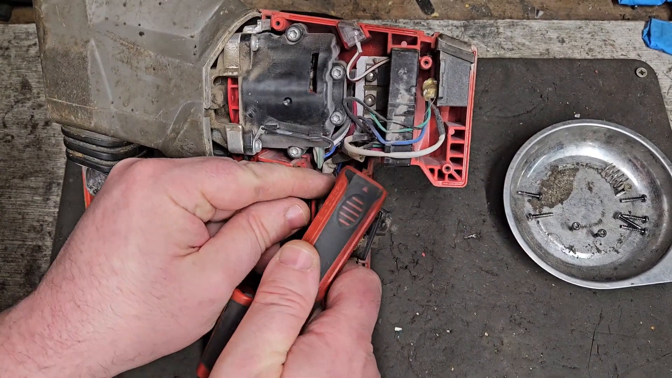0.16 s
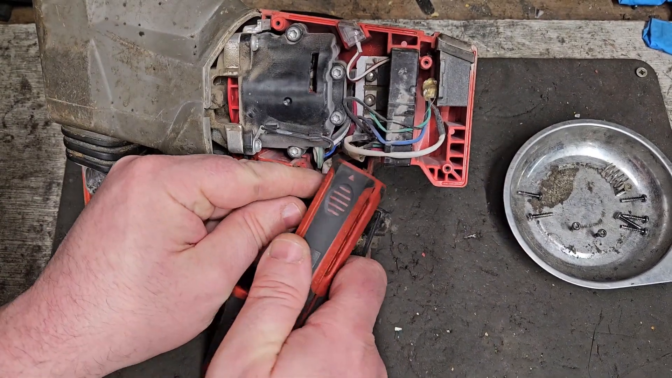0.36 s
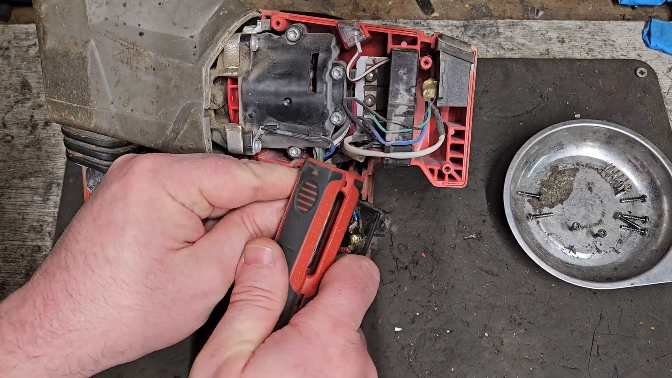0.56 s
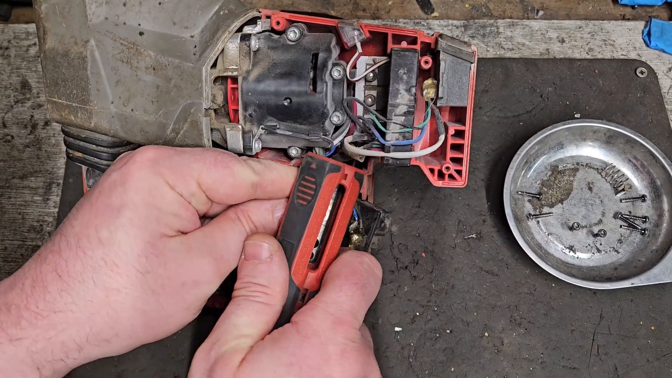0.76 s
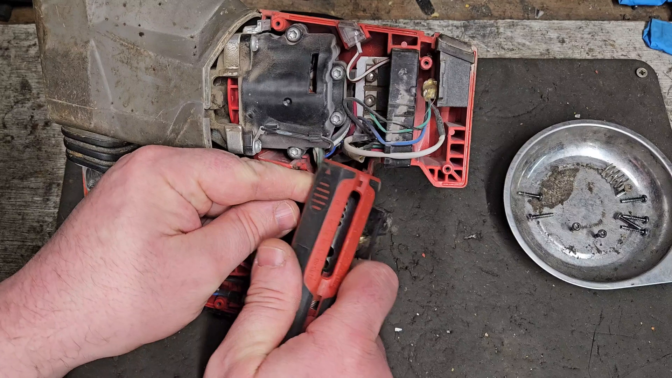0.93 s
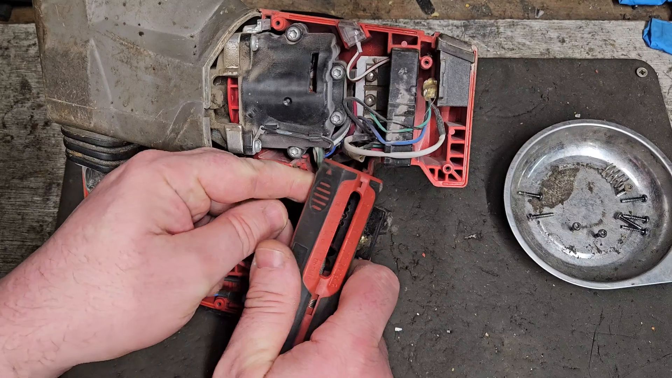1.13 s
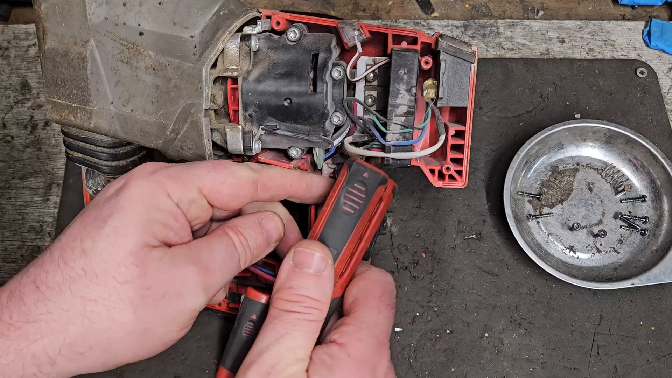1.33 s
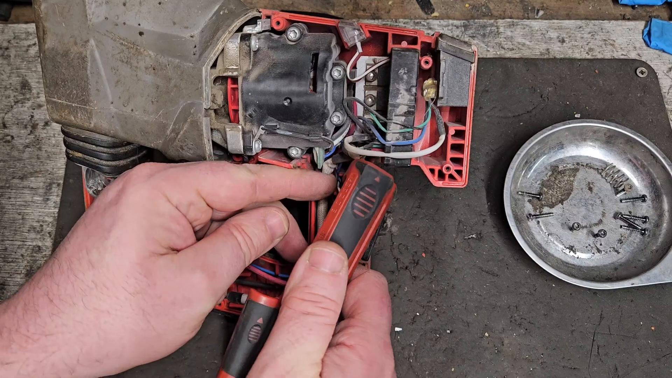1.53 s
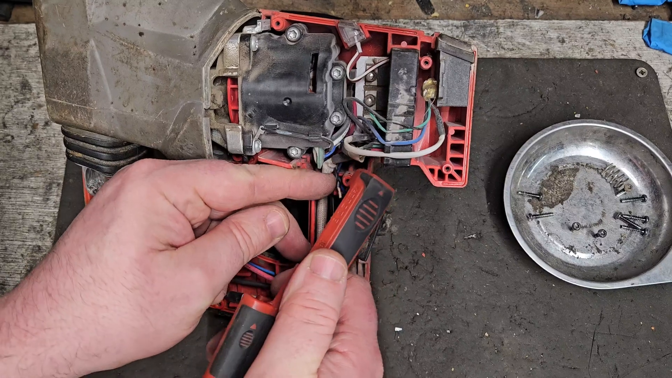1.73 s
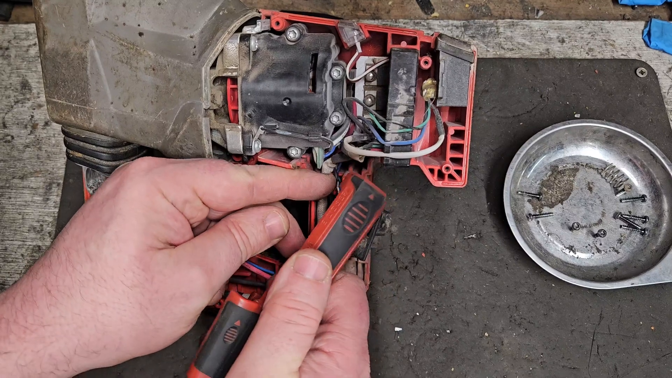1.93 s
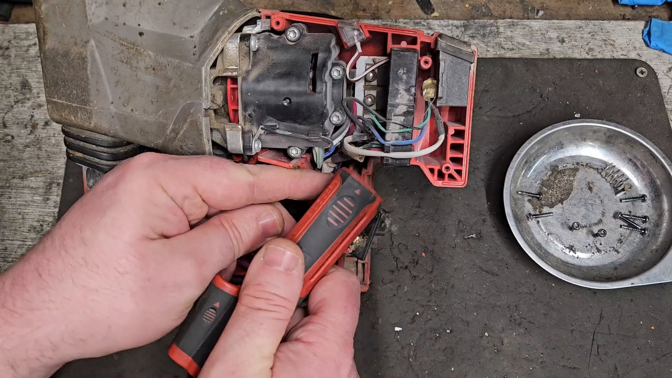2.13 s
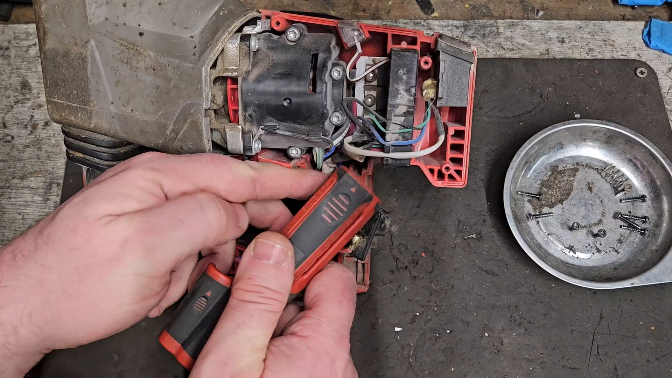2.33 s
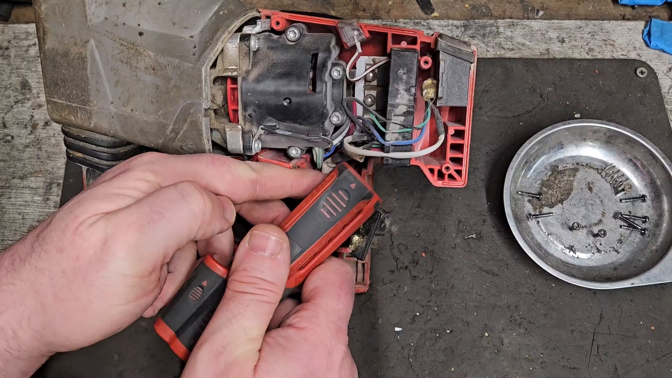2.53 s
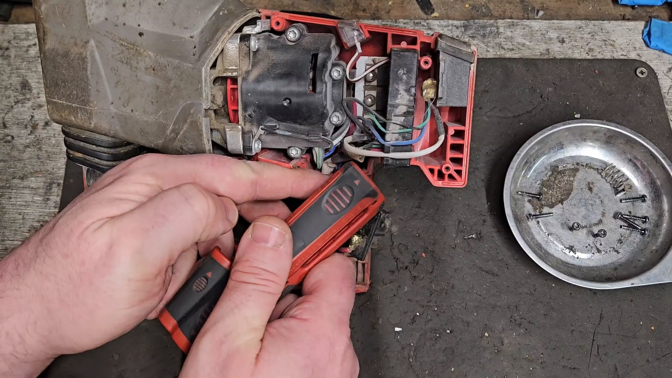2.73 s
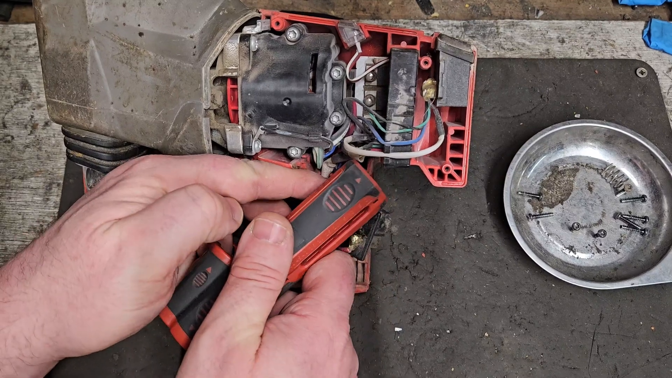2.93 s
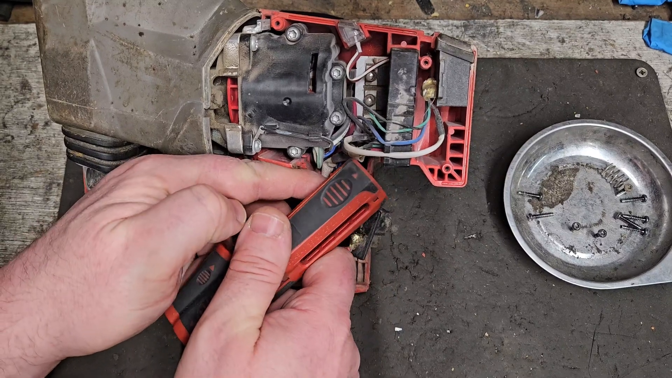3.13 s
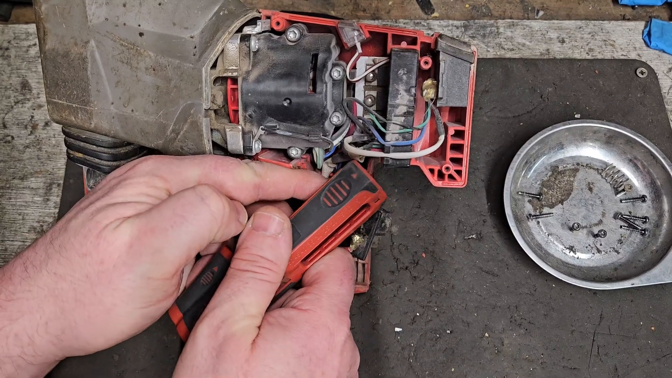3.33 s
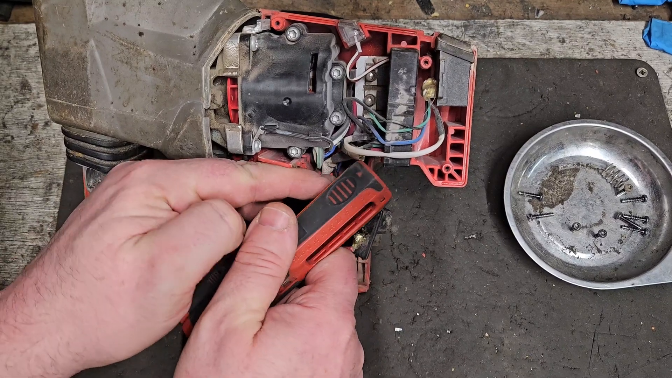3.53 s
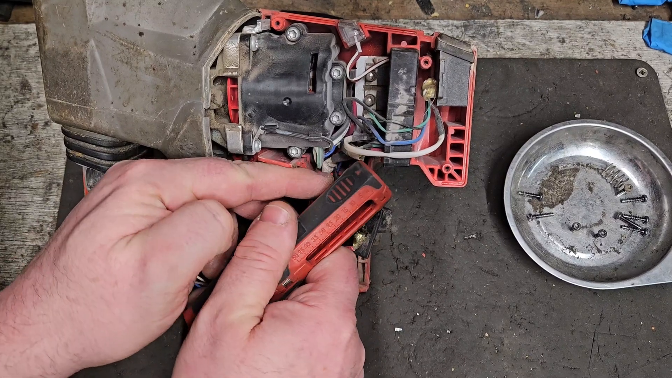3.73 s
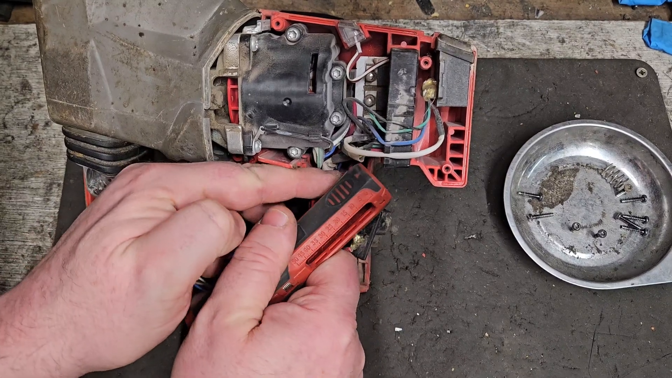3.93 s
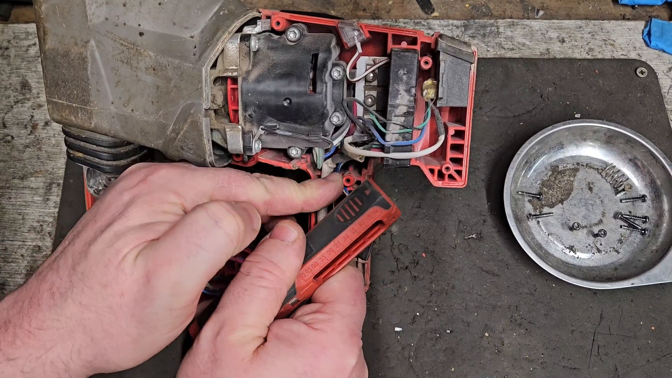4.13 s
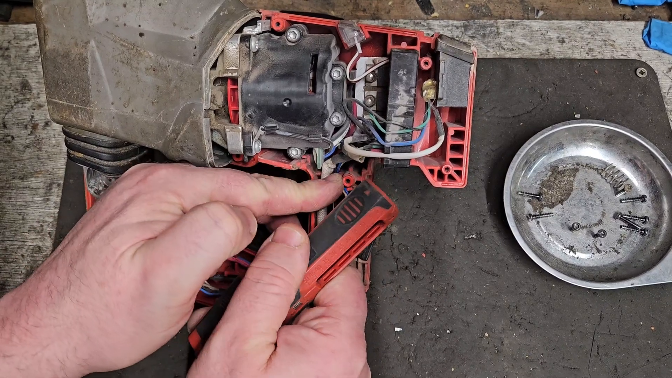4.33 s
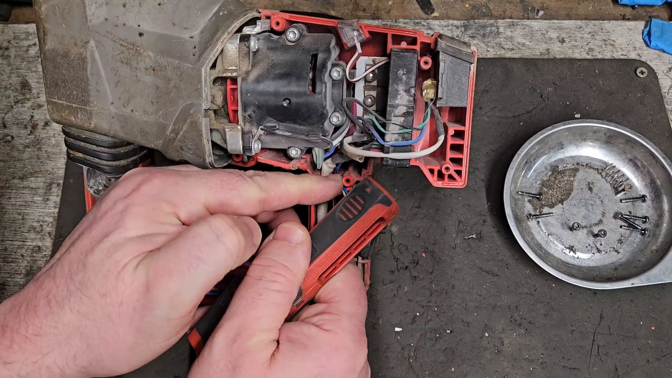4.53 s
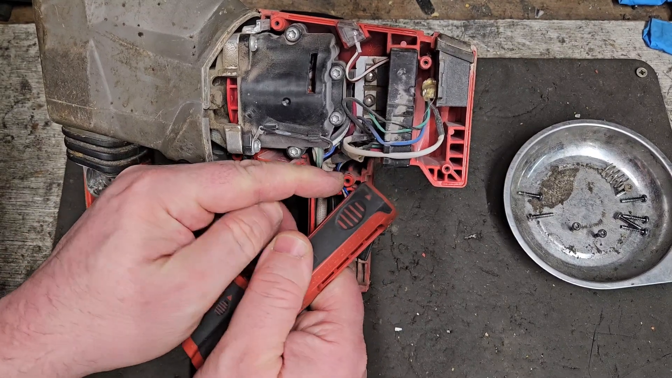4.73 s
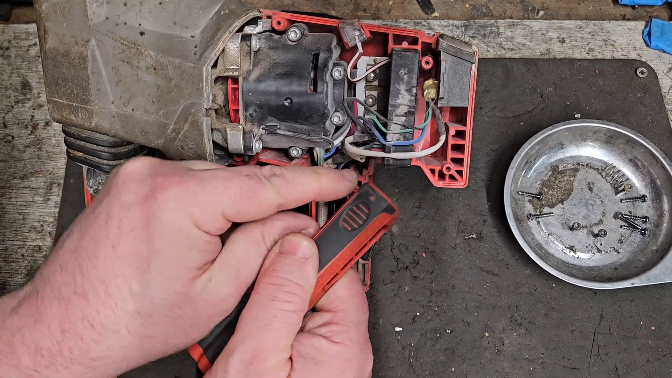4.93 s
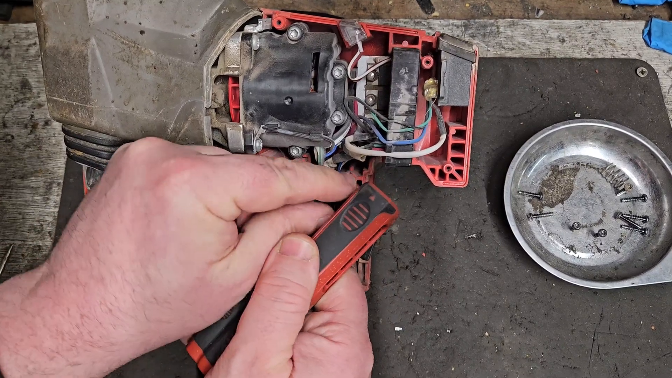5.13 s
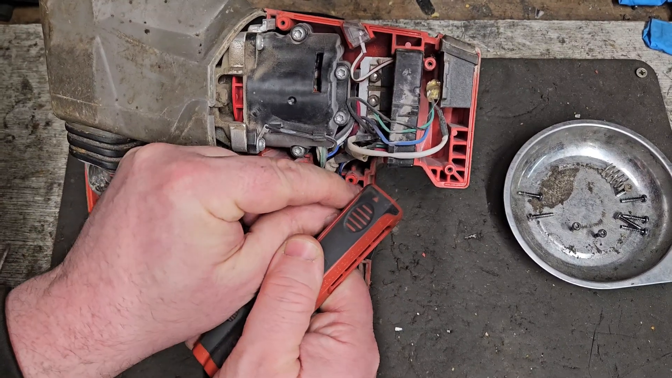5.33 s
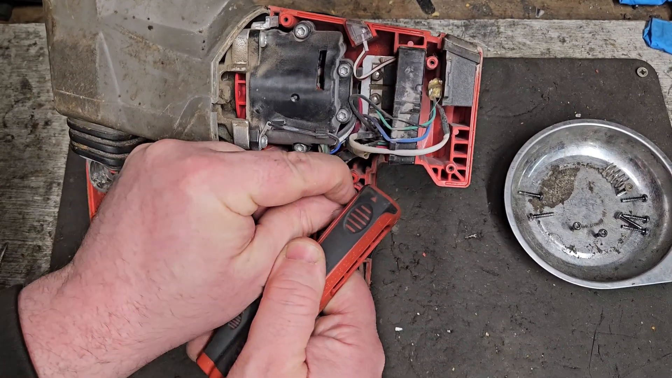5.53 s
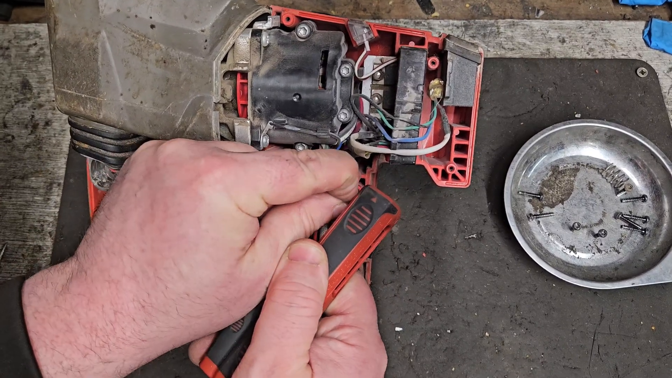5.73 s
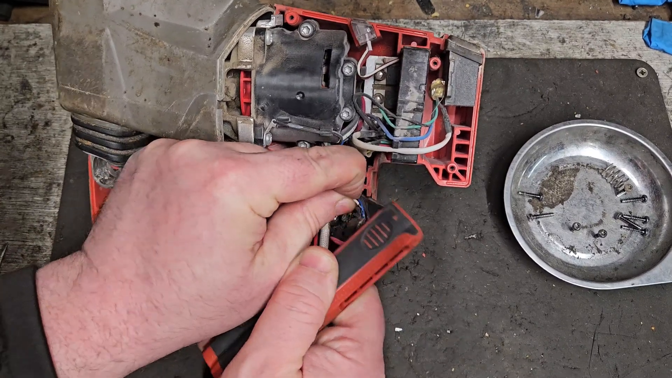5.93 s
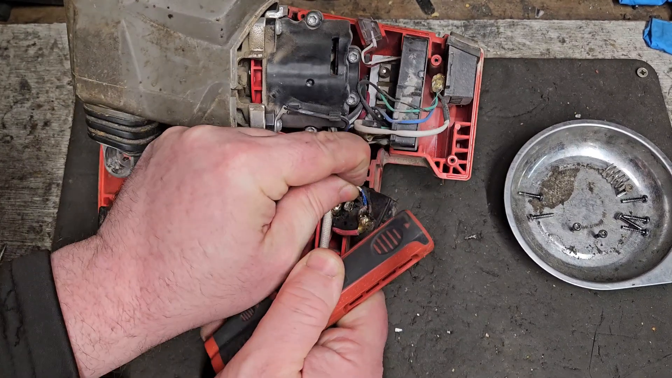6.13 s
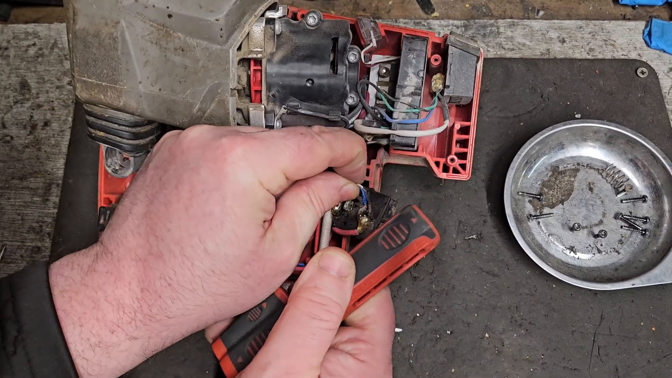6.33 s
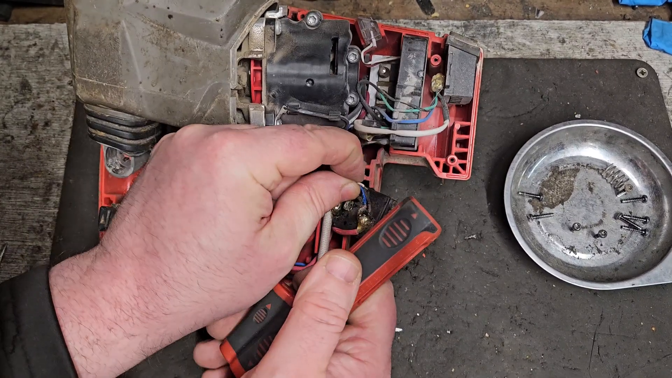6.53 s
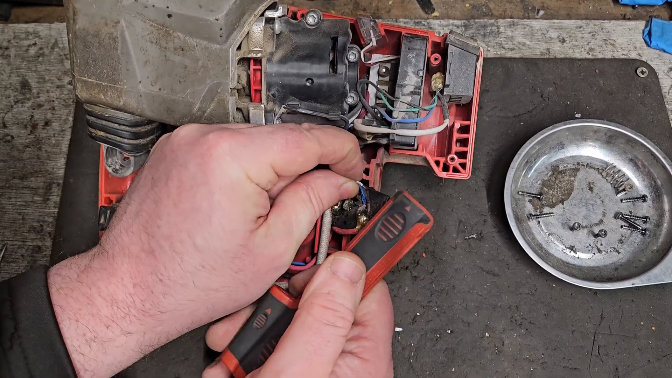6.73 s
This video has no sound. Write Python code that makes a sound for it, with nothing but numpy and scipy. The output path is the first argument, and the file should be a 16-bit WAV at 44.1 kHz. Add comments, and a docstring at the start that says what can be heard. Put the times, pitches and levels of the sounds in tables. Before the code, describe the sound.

Wire strippers work on a thin wire inside an opened power tool on a workbench. Faint scrapes and light plastic ticks come at uneven intervals, and about halfway the blade snaps shut with one sharp snip. More rubbing and a few louder clicks follow, then a quick cluster of hollow bumps and skids against the housing near the end. The sounds are close and fairly dry, over a steady low ventilation hum.

```python
"""Light ticks and scrapes, one sharp snip, then skids and hollow bumps over a low workshop hum.
Wire strippers work on a thin wire inside an opened power tool on a bench. The plastic grip catches
and ticks, jaws and fingers rub in stick-slip, and the steel blade snaps shut once. As the insulation
lets go, the strippers hit the hollow housing and ring its modes. Ventilation and mains make the hum."""
import sys
import numpy as np
from scipy import signal
from scipy.fft import rfft, irfft, next_fast_len
from scipy.io import wavfile
from scipy.ndimage import uniform_filter1d, map_coordinates

SR = 44100
rng = np.random.default_rng(int(sys.argv[2]) if len(sys.argv) > 2 else 0)


def inscribe(sig):
    """Save sig as 16-bit PCM at rate SR to the path in sys.argv[1].

    A 1-D sig is mono; a 2-D sig holds one channel per row.
    Samples are clipped to [-1, 1] before scaling.
    """
    pcm = np.round(np.clip(np.atleast_2d(sig).T, -1, 1) * 32767)
    wavfile.write(sys.argv[1], SR, pcm.astype(np.int16))


N = 298998
T = np.arange(N) / SR
AGE = np.arange(SR // 2) / SR  # time within one event, s
TOP_HZ = 15300
PANEL_FROM_HZ = 700  # housing modes: whole shell below, thin panels above

# hollow housing modes: f/Hz, level/dB, t60/s
HOUSING_MODES = [(72, -9, .15), (167, -5, .16), (226, -8, .09), (305, 0, .1), (392, 1, .1), (505, -10, .08),
                 (860, -3, .1), (996, -6, .11), (1112, -9, .08), (1223, -6, .08), (1362, -8, .08),
                 (1560, -6, .09), (1640, -10, .06)]
# spectrum of a contact breaking loose: f/Hz, level/dB
CRACK_SPECTRUM = [(400, -28.5), (1200, 0.5), (2500, -1), (3500, 0), (6500, -8.5), (8500, -6), (10000, -18),
                  (12500, -11), (16000, -21.5)]


def snip():
    """The blade bites in growing slips, snaps shut and rebounds; the steel jaws ring on faintly."""
    # struck jaw modes: f/Hz, level/dB, t60/s
    jaw_modes = [(2640, -26, 0.012), (3200, -16, 0.012), (3842, 5.5, .004), (4250, -16.5, 0.018),
                 (5540, -16.5, .007), (6540, 3, 0.0023), (8400, -9.5, 0.0039), (11950, -5.5, 0.0019)]
    # long ring of the shut jaws: f/Hz, level/dB, t60/s
    shut_modes = [(2600, -4.5, 0.25), (3060, -8.5, 0.16), (3950, -0.5, .12), (5200, -4, .12),
                  (6600, -3, .11), (7154, -5, .11)]
    snap_s, snap_db = 3.6063, -14
    bites = [(snap_s - k * .0018, snap_db - k * 20) for k in (2, 1)]
    rebounds = [(snap_s + k ** 2 * .0019, snap_db - k * 13) for k in (1, 2)]
    steel = sum(undb(db) * ring(hz, t60, cycles=3) for hz, db, t60 in jaw_modes)
    handle = undb(-25) * ring(1150, .005) + undb(-44) * ring(620, .016) + undb(-50) * ring(172, .15)
    bass_cut = signal.butter(4, 2600, "high", fs=SR, output="sos")  # small jaws radiate little bass
    out = np.zeros((2, N))
    for s, db in bites + [(snap_s, snap_db)] + rebounds:
        metal = signal.sosfilt(bass_cut, steel + undb(-11) * crack(t60_s=.016, rise_s=.0004))
        add(out, s, strike(metal + handle, db))
    add(out, snap_s, undb(-43) * sum(undb(db) * ring(hz, t60) for hz, db, t60 in shut_modes))
    return place(out, pan_db=-1.1, lag_s=.00005)


def bumps():
    """Each blow hits another spot of the housing: shell thud, panel knock, crack."""
    # blows: t/s, thud level/dB, thud f/Hz, knock level/dB, knock f/Hz, crack level/dB
    blows = [(5.0211, -43.5, 172, -48.5, 620, -85), (5.027, -44.5, 411, -52, 680, -87),
             (5.394, -39.5, 138, -49, 605, -64), (5.401, -54, 398, -52.5, 1040, -53.5),
             (5.539, -44, 320, -57, 700, -36.5), (6.002, -28, 300, -38, 507, -69),
             (6.0191, -22.5, 308.5, -31.5, 1370, -42), (6.0247, -24, 339, -37.5, 913, -36.5),
             (6.031, -26, 167, -30, 1513, -58), (6.0373, -30, 163, -28.5, 1030, -37.5),
             (6.06, -30.5, 290, -41, 1490, -48.5), (6.124, -36.5, 300, -41.5, 1204, -64),
             (6.1403, -26, 350, -26.5, 913, -50.5), (6.147, -27, 381, -24.5, 882, -45),
             (6.176, -39, 325, -40.5, 1130, -55.5)]
    hand_damping = 1.18
    modes = [(hz, db, ring(hz, t60 / hand_damping)) for hz, db, t60 in HOUSING_MODES]
    bench = strike(ring(165.5, t60_s=.045), -11.5)
    out = np.zeros((2, N))
    for s, thud_db, thud_hz, knock_db, knock_hz, crack_db in blows:
        spot = rng.standard_normal(len(modes))  # sign and gain of each mode at this spot
        excited = [(hz, np.sign(draw) * undb(db + draw) * mode)
                   for (hz, db, mode), draw in zip(modes, spot)]
        shell = strike(sum(mode for hz, mode in excited if hz < PANEL_FROM_HZ), -1.5)
        panels = strike(sum(mode for hz, mode in excited if hz >= PANEL_FROM_HZ), -10)
        push = strike(ring(thud_hz, t60_s=.037), 0)
        thud = strike(push + bench + shell, thud_db)
        crunch = strike(resonate(grit(spread_db=3) * fade(.025), knock_hz, knock_hz / 2), -4)
        tap = strike(ring(knock_hz, t60_s=.014, cycles=2.8), -1)
        knock = pan(1) * strike(tap + crunch + panels, knock_db)
        add(out, s, thud + knock + strike(crack(t60_s=.03, rise_s=.003), crack_db))
    return place(out, pan_db=2, lag_s=.00018)


def skids():
    """The strippers skid over the housing; slips rumble in the shell and rasp in the panels."""
    # skids: peak t/s, length/s, shell level/dB, panel level/dB, treble level/dB
    drags = [(.32, .06, -62, -68, -88), (4.95, .1, -55, -61, -74), (5.228, .06, -54, -59, -67),
             (5.41, .04, -50, -61, -69), (5.985, .05, -56, -51, -59), (6.043, .04, -36, -38, -48),
             (6.105, .06, -44, -48, -59), (6.147, .028, -35, -35, -52), (6.185, .05, -47, -47, -57)]
    width_hz = 74  # mode width while the tool leans on the housing
    out = np.zeros((2, N))
    for s, length_s, shell_db, panel_db, treble_db in drags:
        slips = grit(spread_db=3)
        shell = sum(undb(db) * resonate(slips.mean(axis=0), hz, width_hz)
                    for hz, db, _ in HOUSING_MODES if hz < PANEL_FROM_HZ)
        panels = sum(undb(db) * resonate(slips, hz, width_hz)
                     for hz, db, _ in HOUSING_MODES if hz >= PANEL_FROM_HZ)
        treble = colour(slips, CRACK_SPECTRUM)
        sound = level(shell, shell_db) + level(panels, panel_db) + level(treble, treble_db)
        add(out, *swell(s, length_s, sound, roundness=1.2))
    return place(out, pan_db=2, lag_s=.00018)


def ticks():
    """Plastic parts catch: a dry knock of the damped grip, plus a bright crack on hard contacts."""
    # catches: t/s, knock level/dB, ring f/Hz, ring width/Hz, crack level/dB
    catches = [(.29, -65, 1450, 400, -88), (.481, -58, 1480, 600, -72), (.862, -62, 1400, 500, -88),
               (.9705, -47.5, 1500, 400, -68), (1.4215, -57, 1250, 400, -92), (1.7665, -48, 1590, 380, -75),
               (2.639, -61, 2600, 1500, -65), (3.118, -61, 1900, 1300, -86), (3.533, -55, 1700, 1800, -53),
               (3.537, -55, 2400, 2200, -49), (4.36, -61, 1700, 1200, -84), (5.217, -47.5, 1600, 450, -59),
               (5.36, -51, 1250, 450, -76), (5.5345, -33, 1200, 700, -46), (5.536, -38, 3000, 1500, -40),
               (5.539, -39, 1700, 1000, -46), (5.9305, -48, 1300, 700, -48), (5.9432, -46, 1800, 900, -32),
               (6.591, -64, 1360, 400, -85)]
    # f/Hz, level/dB
    rattle_spectrum = [(300, -6), (800, 2), (2800, -1), (4000, -7), (7000, -18), (16000, -32)]
    out = np.zeros((2, N))
    for s, knock_db, hz, width_hz, crack_db in catches:
        t60_s = np.log(1000) / (np.pi * width_hz)
        body = strike(ring(hz, t60_s, cycles=3.2), 0) * min(300 / width_hz, 1)
        slips = grit(spread_db=2) * fade(.014) * (1 - np.exp(-AGE / .003))
        rattle = colour(resonate(slips, hz, 2 * width_hz), rattle_spectrum)
        knock = strike(body + strike(rattle, -10), knock_db)
        add(out, s, knock + strike(crack(t60_s=.011, rise_s=.0008), crack_db))
    return place(out, pan_db=2, lag_s=.00014)


def crack(t60_s, rise_s):
    """Bright burst of a contact breaking loose."""
    burst = level(colour(grit(spread_db=3), CRACK_SPECTRUM), 0)
    return burst * fade(t60_s) * (1 - np.exp(-AGE / rise_s))


def scrapes():
    """Jaws and fingers stick and slip along wire and grip: soft rasp, ringing spot, thin hiss."""
    # strokes: peak t/s, length/s, rasp level/dB, centre f/Hz, spot level/dB, hiss level/dB
    strokes = [(.2, .14, -78, 3750, -73, -74), (.52, .18, -72, 4450, -73, -77),
               (.95, .17, -63, 1400, -74, -72), (1.26, .17, -71, 3000, -80, -76),
               (1.69, .22, -71, 2800, -80, -72), (2.09, .07, -82, 3750, -74, -81),
               (2.193, .07, -82, 3620, -73, -78), (2.349, .09, -86, 12300, -69, -67),
               (2.64, .055, -72, 3100, -75, -79), (2.725, .08, -75, 2270, -69, -84),
               (3.49, .1, -65, 1550, -68, -73), (3.868, .06, -68, 1600, -70, -74),
               (4.01, .2, -73, 3200, -79, -77), (4.325, .04, -77, 3500, -82, -75),
               (4.62, .075, -62, 1450, -65, -67), (4.745, .07, -80, 8200, -79, -73),
               (4.945, .12, -63, 1700, -66, -66), (5.08, .15, -73, 3300, -82, -73),
               (5.459, .035, -64, 6400, -68, -65), (5.81, .1, -72, 2200, -77, -77),
               (6.36, .17, -74, 4500, -80, -73)]
    # rasp spectrum: offset from centre/octaves, level/dB
    rasp_shape = [(-1.5, -27.5), (-12, -5.5), (0.5, -5.5), (0, -8), (2, -13.5), (5, -33.5)]
    # sliding hiss spectrum: f/Hz, level/dB
    hiss_shape = [(1500, -43.5), (4000, 5.5), (6000, 9), (8200, 7.5), (9800, 4.5), (12500, 5.5), (15500, 1)]
    out = np.zeros((2, N))
    for s, length_s, rasp_db, centre_hz, spot_db, hiss_db in strokes:
        catches = undb(1.4 * wander(step_samples=400))  # skin and insulation catch and let go
        tilt_db_per_octave = .4385 * (hiss_db - rasp_db)  # a light touch slides brighter
        rasp_spectrum = [(centre_hz * 2. ** octave, db) for octave, db in rasp_shape]
        hiss_spectrum = [(hz, db + tilt_db_per_octave * np.log2(hz / 8000)) for hz, db in hiss_shape]
        rasp = level(colour(rubbed_grip(), rasp_spectrum), rasp_db)
        spot = level(rubbed_spot(centre_hz), spot_db)
        hiss = level(colour(rubbed_grip(), hiss_spectrum), hiss_db)
        add(out, *swell(s, length_s, catches * (rasp + spot + hiss), roundness=1.35))
    return out


def rubbed_grip():
    """Slips excite the grip's resonances; each hold weights them anew."""
    # rubbed grip and jaw modes: f/Hz, width/Hz, level/dB
    grip_modes = [(1240, 450, -9), (1650, 900, -2.5), (2220, 810, -2.5), (2770, 410, -1.5), (3450, 720, -1),
                  (4573, 800, -8), (6330, 170, -7.5), (7290, 890, -4.5), (8390, 160, -3),
                  (11600, 1000, -14)]
    slips = grit(spread_db=4)
    holds_db = 2.5 * rng.standard_normal(len(grip_modes))
    rings = sum(undb(db + hold_db) * resonate(slips, hz, width_hz)
                for (hz, width_hz, db), hold_db in zip(grip_modes, holds_db))
    return waver(undb(-19) * slips + rings, depth=.015)


def rubbed_spot(pitch_hz):
    """The rubbed spot rings at its own pitch and an octave up, capped at TOP_HZ."""
    slips = grit(spread_db=5)
    stage_q = 4.5
    partials = [(pitch_hz, 0), (min(2 * pitch_hz, TOP_HZ), -5)]
    rings = sum(level(resonate_twice(slips, hz, hz / stage_q), db) for hz, db in partials)
    return waver(rings, depth=.02)


def hum():
    """Ventilation rumble with a few resonances, a mains tone and faint air hiss."""
    # ventilation spectrum: f/Hz, level/dB
    rumble_spectrum = [(18, -45), (27, -20), (34, -17), (48, -3), (57, -5), (64, 0), (75, -6), (92, -20),
                       (140, -29), (165, -39), (390, -48), (470, -66), (900, -90)]
    # slow rise of rumble and mains: t/s, level/dB
    rise = [(0, -1), (2.5, 0), (6.7, 1.5)]
    # room and duct resonances: f/Hz, width/Hz, level/dB
    duct_modes = [(190, 25, -77), (258, 14, -75), (305, 35, -73), (349, 20, -69), (380, 20, -73)]
    # air hiss spectrum: f/Hz, level/dB
    air_spectrum = [(100, 0), (450, 0), (700, -3), (1500, -6), (4000, -8), (8500, -11), (10000, -23),
                    (12500, -20), (16000, -23)]
    mains_hz = 101.1
    rumble = level(colour(rng.standard_normal(N), rumble_spectrum), -45)
    drones = sum(level(resonate_twice(rng.standard_normal(N), hz, width_hz), db)
                 for hz, width_hz, db in duct_modes)
    mains = level(np.sin(2 * np.pi * mains_hz * T), -57)
    diffuse = level(colour(rng.standard_normal((2, N)), rumble_spectrum), -61)
    air = level(colour(rng.standard_normal((2, N)), air_spectrum), -81)
    gain = undb(np.interp(T, *np.transpose(rise)))
    return pan(.4) * (gain * (rumble + mains) + drones) + diffuse + air


def workshop(x, t60_s):
    """Fast-fading bench reflections plus a longer room tail, different on each side."""
    # f/Hz, level/dB
    spectrum = [(160, -16), (550, 1), (2700, 1), (3900, -3), (5500, 1), (7000, -2), (15000, 1)]
    onset = np.clip((AGE - .002) / .003, 0, 1)
    envelope = onset * (fade(t60_s / 4) + fade(t60_s))
    tail = colour(rng.standard_normal((2, len(AGE))) * envelope, spectrum)
    tail /= np.sqrt(np.sum(tail ** 2) / 2)
    return signal.fftconvolve(x, tail, axes=1)[:, :N]


def ring(hz, t60_s, cycles=1):
    """One struck mode; builds up over the cycles that the contact lasts."""
    return np.sin(2 * np.pi * hz * AGE) * fade(t60_s) * (1 - np.exp(-(AGE * hz / cycles) ** 2))


def fade(t60_s):
    """Exponential decay."""
    return np.exp(-np.log(1000) * AGE / t60_s)


def grit(spread_db):
    """Stereo noise of unevenly sized slips, partly shared by both sides."""
    size = len(AGE)
    noise = rng.standard_normal((3, size))
    slips = np.repeat(undb(spread_db * rng.standard_normal(size // 32 + 1)), 32)[:size]
    return level((noise[:2] + noise[2]) * slips, 0)


def swell(peak_s, length_s, sound, roundness):
    """Start time and shaped sound of a stroke; roundness 1 is pointed, 2 is round."""
    rise_share = .51
    t = AGE - AGE.mean()
    reach_s = length_s * np.where(t < 0, rise_share, 1 - rise_share)
    pressure = np.exp(-np.abs(t / reach_s) ** roundness)
    return max(peak_s + t[0], 0), (sound * pressure)[:, peak_s + t >= 0]


def wander(step_samples):
    """Random piecewise-linear curve."""
    knots_s = AGE[::step_samples]
    return np.interp(AGE, knots_s, rng.standard_normal(len(knots_s)))


def waver(x, depth):
    """Pitch wanders by a share of itself as the contact moves."""
    position = np.cumsum(1 + depth * wander(step_samples=2200))
    return np.array([map_coordinates(side, [position], mode="mirror") for side in x])


def resonate(x, hz, width_hz):
    """Two-pole resonance, unity gain at the centre."""
    return signal.lfilter(*signal.iirpeak(hz, hz / width_hz, fs=SR), x)


def resonate_twice(x, hz, width_hz):
    """Two equal resonances in series."""
    return resonate(resonate(x, hz, width_hz), hz, width_hz)


def colour(x, points):
    """Minimum-phase filter from (f/Hz, level/dB) points."""
    size = next_fast_len(x.shape[-1] + 2048)
    size += size % 2
    hz, db = np.transpose(points)
    gain_db = np.interp(np.log(np.arange(size // 2 + 1) * SR / size + 1), np.log(hz), db)
    cepstrum = irfft(np.log(undb(gain_db)))
    cepstrum[1:size // 2] *= 2
    cepstrum[size // 2 + 1:] = 0
    return irfft(rfft(x, size) * np.exp(rfft(cepstrum)))[..., :x.shape[-1]]


def undb(db):
    """Decibels to gain."""
    return 10 ** (np.asarray(db) / 20)


def level(x, db):
    """Scale to an rms level."""
    return x * undb(db) / np.sqrt(np.mean(x ** 2))


def strike(x, db):
    """Scale a hit to an rms level over its loudest 5 ms."""
    power = np.mean(np.atleast_2d(x) ** 2, axis=0)
    return x * undb(db) / np.sqrt(uniform_filter1d(power, size=SR // 200, mode="constant").max())


def pan(db):
    """Stereo gains, left over right by db."""
    return undb(np.array([[db], [-db]]) / 2)


def place(x, pan_db, lag_s):
    """Pan a source and delay its right side."""
    return pan(pan_db) * np.array([x[0], np.roll(x[1], round(lag_s * SR))])


def add(out, s, sound):
    """Mix a sound in at s seconds."""
    start = int(s * SR)
    part = out[..., start:start + sound.shape[-1]]
    part += sound[..., :part.shape[-1]]


def scene():
    """Handwork and its reflections, over the hum."""
    # signal, room send/dB
    sources = [(ticks(), -11), (snip(), -10.5), (bumps() + skids(), -9), (scrapes(), -7)]
    direct = sum(x for x, _ in sources)
    send = sum(undb(send_db) * x for x, send_db in sources)
    return direct + workshop(send, t60_s=.2) + hum()


def record(dry):
    """Steep low-pass at TOP_HZ."""
    return signal.sosfilt(signal.ellip(8, .2, 70, TOP_HZ, fs=SR, output="sos"), dry)


dry = scene()
out = record(dry)
inscribe(out)
```